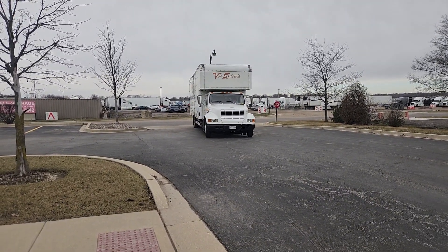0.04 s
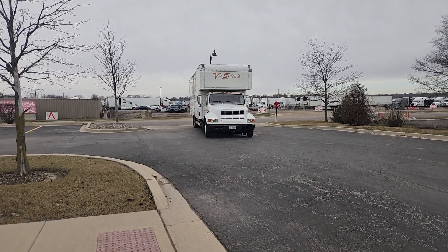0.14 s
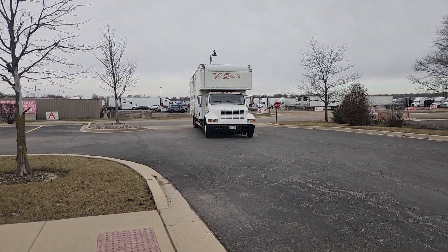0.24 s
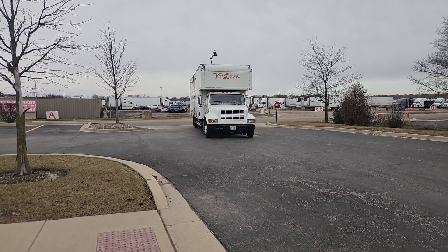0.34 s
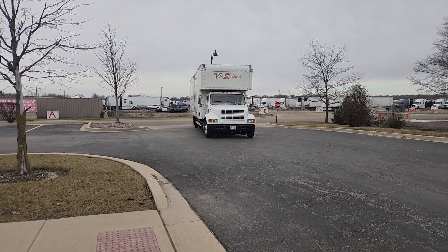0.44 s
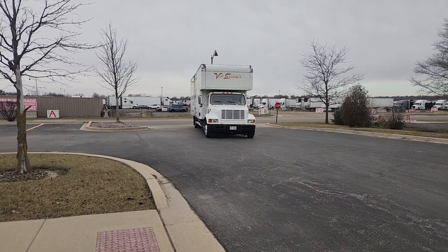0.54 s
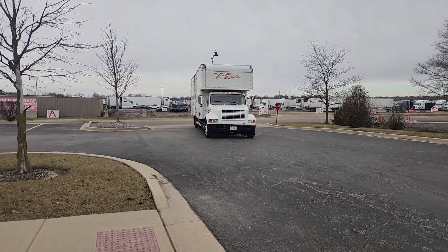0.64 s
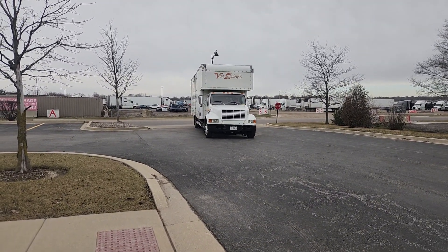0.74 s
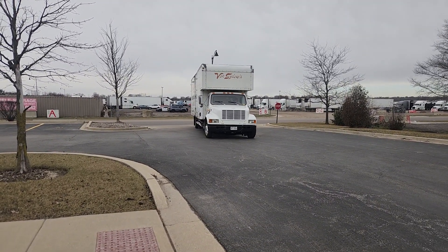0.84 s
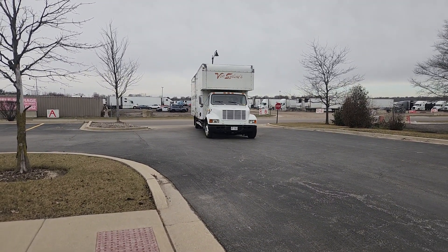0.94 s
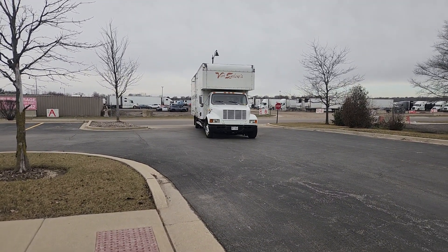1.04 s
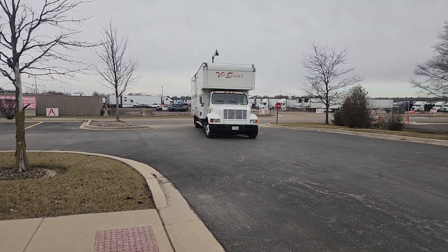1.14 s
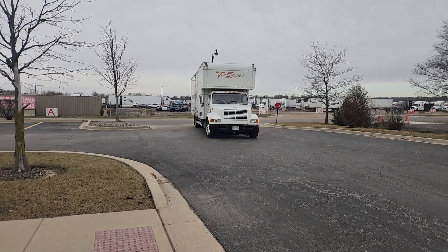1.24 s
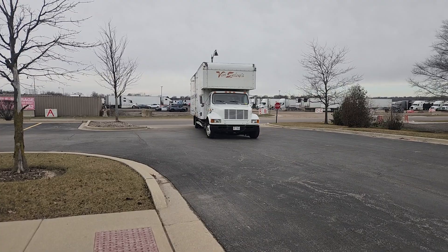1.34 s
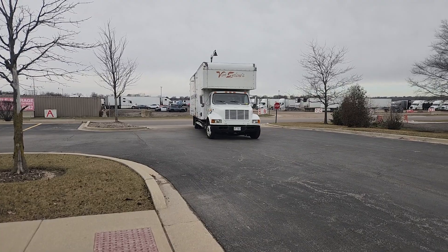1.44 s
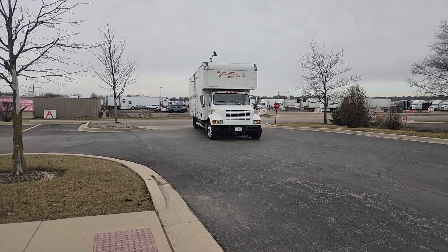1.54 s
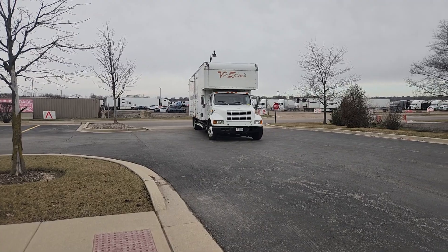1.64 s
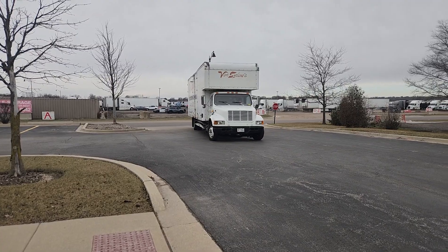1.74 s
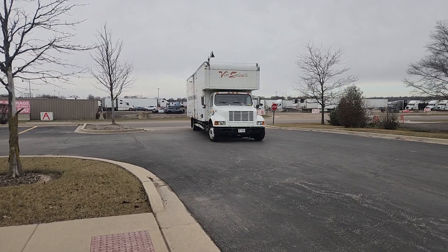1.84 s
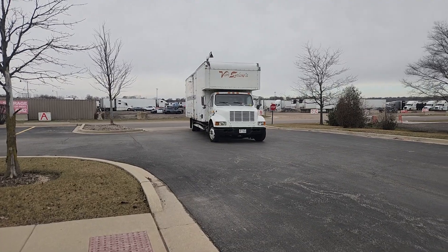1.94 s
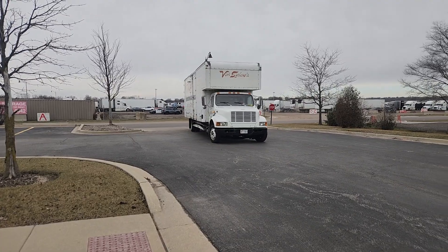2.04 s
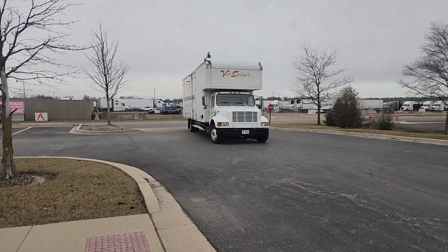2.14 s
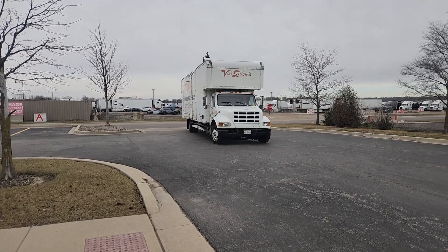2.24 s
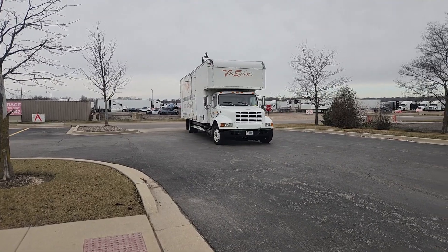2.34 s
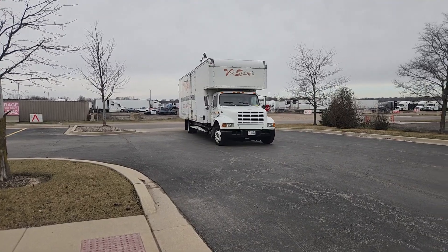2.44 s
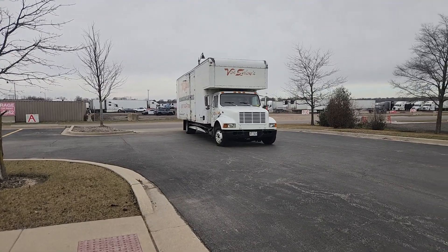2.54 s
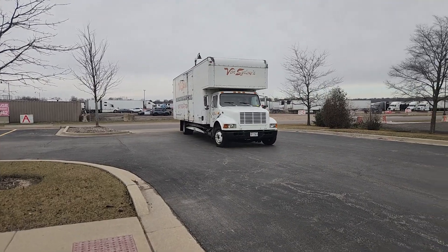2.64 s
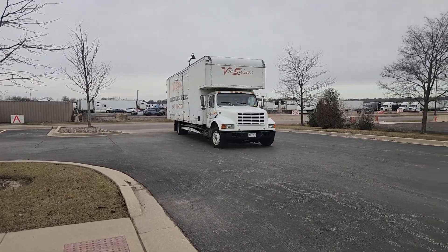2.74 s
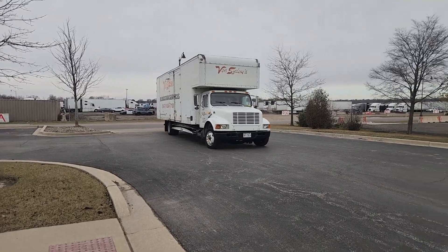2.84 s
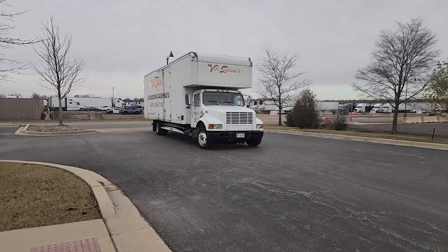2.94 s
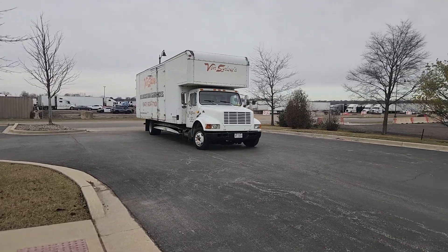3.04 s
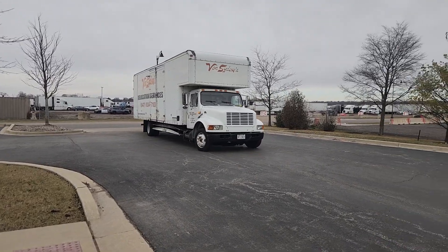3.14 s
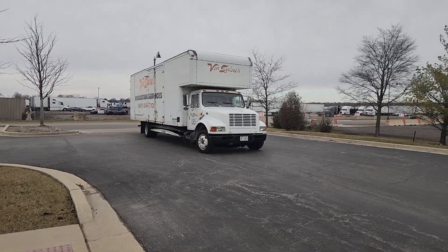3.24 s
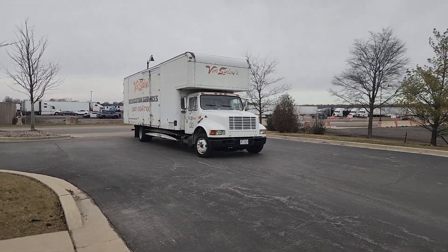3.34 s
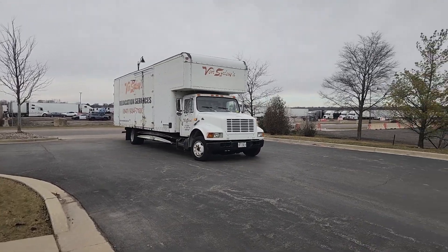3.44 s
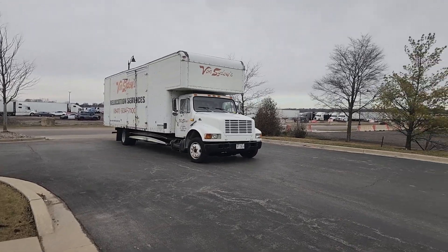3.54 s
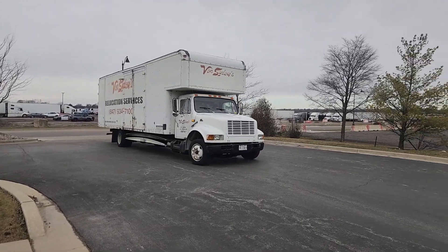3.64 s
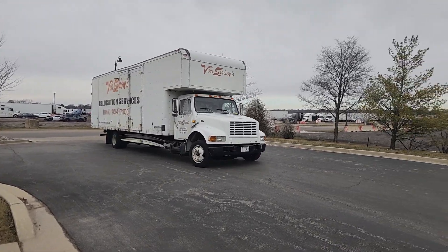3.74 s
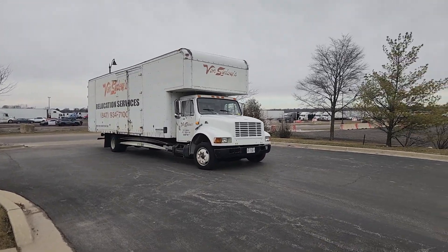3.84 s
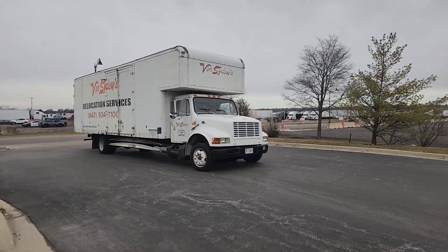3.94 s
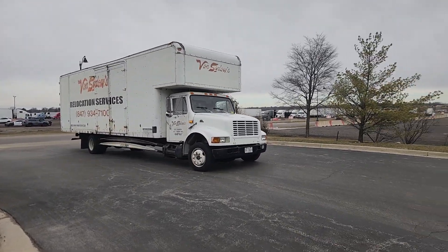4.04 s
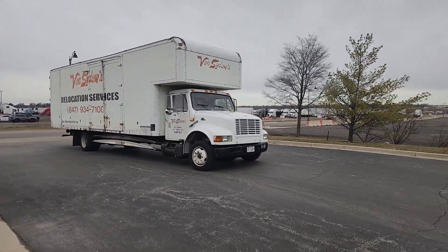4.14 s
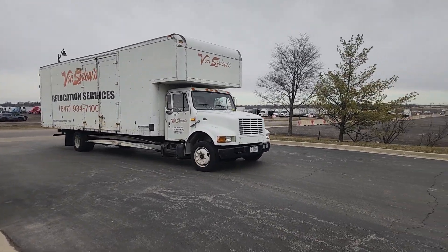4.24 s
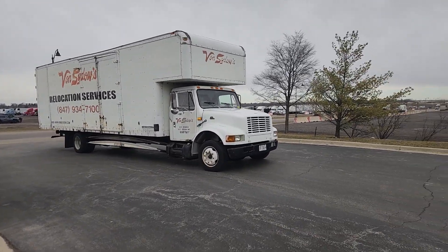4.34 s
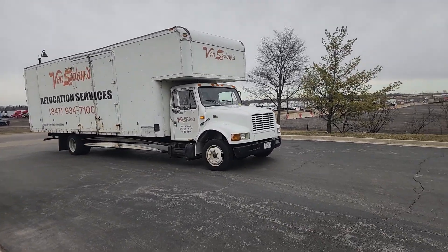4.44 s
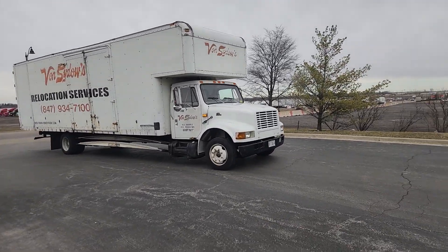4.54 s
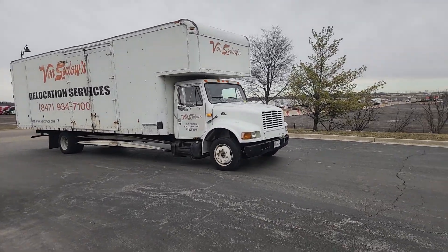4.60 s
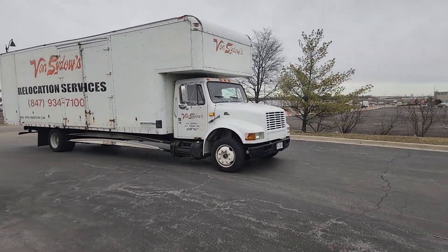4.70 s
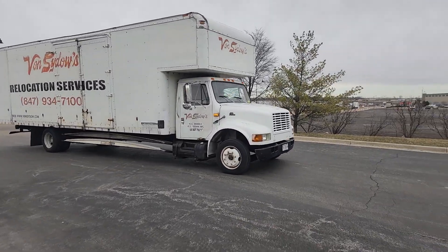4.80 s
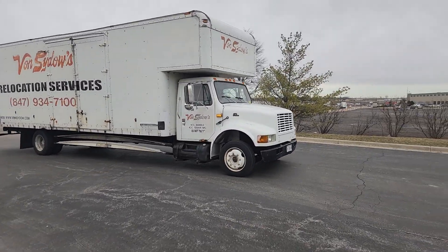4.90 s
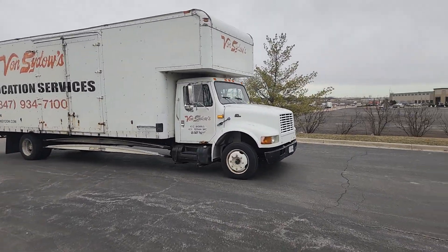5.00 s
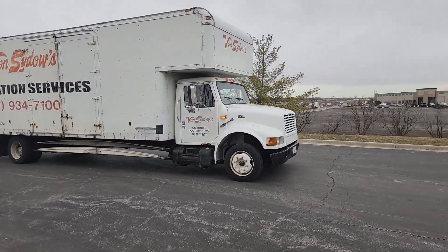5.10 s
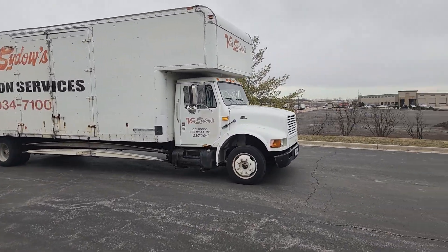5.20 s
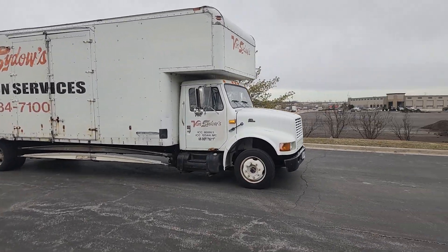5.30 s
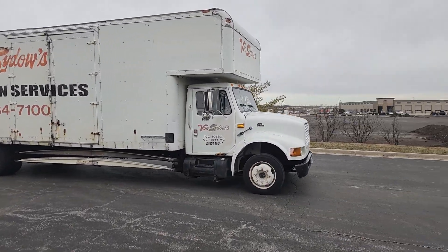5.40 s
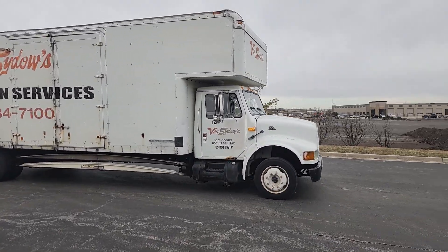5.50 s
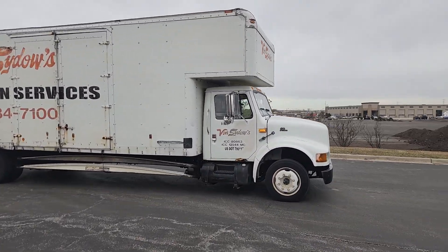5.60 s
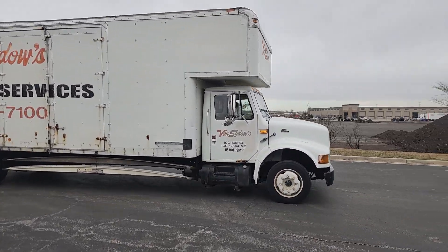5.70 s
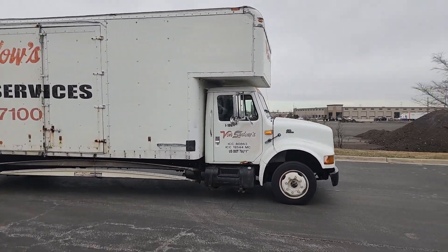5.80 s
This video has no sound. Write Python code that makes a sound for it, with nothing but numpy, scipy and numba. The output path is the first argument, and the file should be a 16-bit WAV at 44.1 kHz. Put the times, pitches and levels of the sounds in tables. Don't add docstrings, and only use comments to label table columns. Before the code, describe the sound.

Outdoors in an open lot, a diesel box truck starts nose-on with a quiet, low, uneven idle throb and a tiny puff of breeze. From about 0.4 s the engine picks up; clatter and valve ticks jump forward near 0.6 s, and pitch climbs steadily to nearly double by 1.4 s, with a brighter, harder edge around 1.2 s. From 1.5 to 3 s it holds a steady, rough drone whose boom fades and swells. As the truck swings side-on from 3 s, rumble, fan hiss and fine ticking grow fuller, their tone sliding, with a dip in the roar near 4 s and a soft wind puff at 4.6 s. By 5 to 5.9 s it is close and heavy, pitch sagging slightly, with a last low wind puff as it cuts off still running. Nearly everything is in the right channel; the left holds a faint, muffled boom.

```python
import sys
import numpy as np
from scipy import signal
from scipy.fft import rfft, irfft, next_fast_len
from scipy.io import wavfile
from numba import njit

SR = 44100
rng = np.random.default_rng(int(sys.argv[2]) if len(sys.argv) > 2 else 0)


def attenuation_scalar(level_db):
    decades = np.asarray(level_db, float) / 20
    return 10 ** decades


def file_out(sig):
    cols = np.atleast_2d(sig).T
    lim = np.clip(cols, -1, 1)
    pcm = np.round(lim * 32767).astype(np.int16)
    wavfile.write(sys.argv[1], SR, pcm)


N = 258426
BLOCK = 64

# start_s, firing_hz, boom_db
ENGINE_RUN = [(0, 36.59, -38), (.42, 40.18, -35.5), (.49, 41.28, -24), (.72, 49.62, -19.5),
              (.93, 54.85, -20.1), (1.06, 61.49, -17), (1.21, 69.72, -18.5), (1.42, 72.5, -20),
              (1.55, 70.58, -21.5), (2.17, 70.96, -20), (2.32, 73.09, -15.5), (2.8, 69.35, -22),
              (3.38, 69.65, -20), (3.75, 68.69, -15.5), (3.87, 69.71, -24), (4.6, 70.1, -16),
              (5.55, 66.43, -13), (5.86, 64.78, -9)]


def engine_run():
    return in_time(ENGINE_RUN)


# start_s, clatter_db
ENGINE_EFFORT = [(0, -40.5), (.35, -39), (.55, -38.5), (.59, -34), (.7, -32), (.9, -33), (.94, -32),
                 (1.12, -29), (1.47, -26.5), (1.56, -29.5), (2.25, -28), (2.5, -27), (2.72, -28),
                 (3.3, -28), (4.3, -26.5), (4.82, -26), (5.5, -27.5), (5.86, -28)]


def effort_db():
    return in_time(ENGINE_EFFORT)[0]


# start_s, share (0-1)
TRUCK_TURN = [(0, 0.01), (2.7, 0), (3.3, 0.36), (4.1, 0.59), (4.9, 0.74), (5.5, 0.96), (5.86, 0.97)]


def side_share():
    return in_time(TRUCK_TURN)[0]


# start_s, half_length_s, change_db
FIRST_FADES = [(0, 0.02, -4), (.05, .02, 7), (.11, 0.038, -8), (.67, .025, -4), (.93, .04, -3),
               (1.23, 0.05, -4.5), (1.42, .04, -3), (1.6, .03, -6), (2.79, .03, -1), (2.97, .1, -0.5),
               (4.91, 0.13, -3), (5.77, 0.078, -10)]
OVERTONE_2_FADES = [(.7, 0.28, 7.5), (1.6, .2, -18), (2.5, .7, -4.5), (3.8, 0.37, -14), (5.0, 0.34, 0),
                    (5.8, 0.18, -4)]
OVERTONE_3_FADES = [(.7, 0.22, -24), (1.2, 0.15, -4), (3.9, 0.76, -13.5), (5.05, 0.41, -21),
                    (5.7, 0.12, -3), (5.86, .08, 5)]


def boom_levels(boom_db):
    second_db = layer_db(cruise_db=-34, share=1.48, side_db=3.9)
    third_db = layer_db(cruise_db=-35, share=0.92, side_db=2.8)
    return [boom_db + bumps(FIRST_FADES), second_db + bumps(OVERTONE_2_FADES),
            third_db + bumps(OVERTONE_3_FADES)]


# times_firing_rate, level_db (against the rumble)
UNEVEN_TONES = [(0.83, -6), (1.5, -1.2), (11 / 6, -21), (13 / 6, -8), (2.3, -6), (2.8, -11),
                (17 / 6, -13.5)]


def exhaust(firings, orders_db, rumble_db):
    phase = 2 * np.pi * firings + 1.4
    out = np.zeros(N)
    for k, level_db in enumerate(orders_db):
        wander = .04 * drift(7) + .35 * k * drift(6) + .5 * k * drift(.4)
        level = np.sqrt(2) * attenuation_scalar(level_db + .7 * k * drift(5))
        out += level * np.cos((k + 1) * phase + wander)
    for multiple, level_db in UNEVEN_TONES:
        level = attenuation_scalar(rumble_db + level_db + 1.9 * drift(3.2))
        out += level * np.cos(multiple * phase + 0.92 * drift(3.2))
    return out


# start_s, half_length_s, change_db
RUMBLE_FADES = [
    (.29, 0.15, -6),
    (3.95, 0.19, -6.5),
    (4.9, 0.12, -4),
    (5.86, 0.19, -8),
]


def rumble_level():
    return layer_db(cruise_db=-28, share=0.95, side_db=3.5) + bumps(RUMBLE_FADES)


# pitch_hz, level_db (per Hz)
RUMBLE_TONE = [(8.8, -46), (15, -19), (39, -6.5), (70, -2), (92, -2.5), (117, -2), (150, -1.5), (197, -4),
               (279, -15.5), (330, -19), (430, -37), (730, -120)]


def rumble(repeat, rumble_db):
    roar = coloured(rng.standard_normal(N) + 0.2 * repeat, RUMBLE_TONE)
    return attenuation_scalar(rumble_db - 1.5 + 0.7 * drift(8.3)) * roar


# pitch_hz, level_db (per Hz)
CLATTER_TONE = [(180, -4), (260, -4), (400, 0), (700, 0), (1200, -1.5), (1600, -6.5), (1900, -21.5),
                (2600, -38)]


def clatter(firings, repeat):
    block = rng.standard_normal(N) + .7 * repeat
    block = block * knock(firings, depth=.09, sharp=2.5, lag=.45)
    return attenuation_scalar(effort_db() + 0.13 * drift(27)) * coloured(block, CLATTER_TONE)


# pitch_hz, level_db (per Hz)
FAN_TONE = [(1200, -24.5), (1700, 0), (2200, -1.5), (3000, -7.5), (3800, -10), (4700, -13), (5300, -22.5),
            (6000, -36)]


def fan_hiss(firings, repeat):
    air = rng.standard_normal(N) + .4 * repeat
    air = air * knock(firings, depth=.06, sharp=2.5, lag=.35)
    level_db = layer_db(cruise_db=-39.5, share=0.93, side_db=3.5)
    return attenuation_scalar(level_db + 0.36 * drift(17)) * coloured(air, FAN_TONE)


# start_s, half_length_s,
# change_db
VALVE_SWELLS = [(3.75, 0.27, 1.5), (4.5, 0.22, 1), (1.2, .2, 3), (1.2, .15, -1)]
# start_s, step_db
PEDAL_STEPS = [
    (.57, 5.5),
    (.92, 1.5),
]


def valve_level():
    level_db = layer_db(cruise_db=-62.5, share=0.75, side_db=6) + bumps(VALVE_SWELLS)
    for start_s, step_db in PEDAL_STEPS:
        level_db = level_db - step_db * (np.arange(N) < start_s * SR)
    return level_db


# pitch_hz, level_db (per Hz)
VALVE_TONE = [(4900, -15.5), (5400, -7), (6000, -4.5), (6700, -7), (7400, -1.5), (8000, -8.5), (8600, -15),
              (9600, -9.5), (10900, -8.5), (11900, -2), (12900, -3.5), (13800, -17), (15000, -21),
              (15800, -30)]


def valves(firings):
    taps = rng.standard_normal(N) * ticks(rate=33.0, spread_db=0.5)
    taps = taps * knock(firings, depth=.1, sharp=1.9, lag=0.2)
    sound = coloured(taps, VALVE_TONE)
    nose_on = 1 - side_share()[::BLOCK]
    # pitch_hz, width_hz, change_db when nose-on
    for hz, width_hz, level_db in [(6470, 1200, -2.5), (8500, 700, -3.5), (10600, 1500, -4), (14500, 2500, 5.0)]:
        sound = peak(sound, hz, width_hz, level_db * nose_on)
    return attenuation_scalar(valve_level() + .6 * drift(6.7)) * sound


def ticks(rate, spread_db):
    strength = attenuation_scalar(spread_db * np.minimum(rng.exponential(1, N), 4))
    hits = (rng.random(N) < rate / SR) * strength
    fade = np.exp(-1 / (0.0051 * SR))
    return rms_one(1 + 0.46 * signal.lfilter([1], [1, -fade], hits))


CYLINDER_STRENGTH = [-1.5, -5, 0.3, -1, -3.5, -4]


def knock(firings, depth, sharp, lag):
    since = firings - lag
    count = np.floor(since).astype(int)
    chance_db = 1.5 * rng.standard_normal(999)[count]
    strength = attenuation_scalar(np.array(CYLINDER_STRENGTH)[count % 6] + chance_db)
    burst = np.exp(-sharp * (since % 1))
    return rms_one(1 - depth + depth * strength * burst / burst.mean())


def contacts(firings, count, slop):
    angle, size = np.sort(rng.uniform(0, 6, count)), rng.standard_normal(count)
    turns = 6 * np.arange(firings[-1] // 6 + 1)
    at = (turns[:, None] + angle).ravel()
    at = np.interp(at, firings, np.arange(N))
    at = at + slop * SR * rng.standard_normal(len(at))
    out = np.zeros(N)
    np.add.at(out, np.clip(at, 0, N - 1).astype(int), np.resize(size, len(at)))
    return rms_one(out)


# nose_hz, half_turned_hz, side_hz, width_hz,
# nose_db, half_turned_db, side_db
BODY_REFLECTIONS = [(468, 617, 556, 240, 2.5, 4, 5.5), (721, 827, 980, 131, -7, -5, -4),
                    (1056, 1105, 1240, 325, 3.5, 3.5, 3.0), (1240, 1350, 1620, 66, -8.5, -2.5, -9),
                    (1497, 1560, 2000, 126, 8, 3, .3), (1665, 1900, 2430, 160, -6.5, -3.5, -9),
                    (2360, 2540, 2650, 200, 0, 3.5, -1.2), (2500, 2560, 2880, 110, -2.5, -7.5, -1),
                    (2640, 2990, 3150, 210, 3.5, 8, 6), (2900, 2960, 3030, 110, -5.5, -7.5, -10),
                    (3100, 3700, 3200, 200, 2, -0.7, 3), (3380, 3550, 3800, 150, -5, -2.5, 0),
                    (3720, 3850, 4000, 150, -5, -0.5, 3), (4430, 4440, 4300, 260, 1.5, 3.5, 4)]
# start_s, pitch_hz, change_db
PANEL_GLINTS = [(.3, 420, -2.5), (.75, 1000, 5), (1.8, 408, 5), (3.2, 386, 4), (4.0, 352, -2),
                (4.4, 570, 0.5), (3.7, 4800, 9), (3.7, 4240, 6), (4.85, 4794, 9.5), (5.0, 4220, 8),
                (5.05, 3130, 3.5), (5.75, 4800, 5)]
# start_s, half_length_s, pitch_hz, width_hz, change_db
BLOCK_SURGE = (1.21, 0.54, 2030, 1240, 5.4)


def reflections(x):
    turn = side_share()[::BLOCK]
    for row in BODY_REFLECTIONS:
        hz = np.interp(turn, [0, .5, 1], row[:3])
        level_db = np.interp(turn, [0, .5, 1], row[4:])
        shimmer_db = 0.51 * drift(2.2)[::BLOCK]
        x = peak(x, hz, row[3], level_db + shimmer_db)
    for at, hz, level_db in PANEL_GLINTS:
        x = peak(x, hz, 150, bumps([(at, 0.35, level_db)])[::BLOCK])
    at, half, hz, width_hz, level_db = BLOCK_SURGE
    return peak(x, hz, width_hz, bumps([(at, half, level_db)])[::BLOCK])


# start_s, half_length_s, level_db
BREEZE_PUFFS = [
    (0.018, 0.018, -28.5),
    (.1, .03, -36),
    (4.6, .06, -32),
    (5.86, .04, -25.5),
]


def breeze():
    band = signal.butter(2, [40, 110], "band", fs=SR, output="sos")
    low = rms_one(signal.sosfilt(band, rng.standard_normal(N)))
    return low * sum(attenuation_scalar(level_db) * bumps([(at, half, 1)]) for at, half, level_db in BREEZE_PUFFS)


def layer_db(cruise_db, share, side_db):
    return cruise_db + share * (effort_db() + 28.5) + side_db * side_share()


def in_time(rows):
    s, *columns = np.transpose(rows)
    return [np.interp(np.arange(N) / SR, s, c) for c in columns]


def bumps(rows):
    s = np.arange(N) / SR
    return sum(level_db * np.exp(-((s - at) / half) ** 2) for at, half, level_db in rows)


def rms_one(x):
    return x / np.sqrt(np.mean(x ** 2) + 1e-20)


def drift(rate):
    r = np.exp(-80 * np.pi * rate / SR)
    slow = signal.lfilter([1], [1, -2 * r, r * r], rng.standard_normal(N // 40 + 2002))
    slow = slow[2000:]
    return np.interp(np.arange(N) / 40, np.arange(len(slow)), rms_one(slow))


def coloured(x, spectrum):
    hz, level_db = np.transpose(spectrum)
    size = next_fast_len(N)
    grid = np.maximum(np.arange(size // 2 + 1) * SR / size, 1)
    gain = attenuation_scalar(np.interp(np.log(grid), np.log(hz), level_db, left=-90, right=-90))
    return rms_one(irfft(rfft(x, size) * gain, size)[:N])


def peak(x, hz, width_hz, level_db):
    w, lift, damp = 2 * np.pi * hz / SR, attenuation_scalar(level_db / 2), np.pi * width_hz / SR
    norm = 1 + damp / lift
    b0, b2 = (1 + damp * lift) / norm, (1 - damp * lift) / norm
    a1, a2 = -2 * np.cos(w) / norm, (1 - damp / lift) / norm
    return sliding_biquad(x, b0, a1, b2, a2, size=BLOCK)


@njit
def sliding_biquad(x, b0, a1, b2, a2, size):
    y, s1, s2 = np.empty_like(x), 0., 0.
    for i in range(len(x)):
        k = i // size
        y[i] = b0[k] * x[i] + s1
        s1 = a1[k] * (x[i] - y[i]) + s2
        s2 = b2[k] * x[i] - a2[k] * y[i]
    return y


def scene():
    firing_hz, boom_db = engine_run()
    firings = np.cumsum(firing_hz) / SR
    turn, rumble_db = side_share(), rumble_level()
    repeat = contacts(firings, count=400, slop=3e-5) * (1 - .5 * turn)
    uneven_db = rumble_db - 9.0 + 5.8 * turn
    truck = exhaust(firings - firings[-1], boom_levels(boom_db), uneven_db)
    truck = truck + rumble(repeat, rumble_db)
    truck = truck + reflections(clatter(firings, repeat) + fan_hiss(firings, repeat))
    truck = truck + valves(firings) + breeze()
    return np.array([truck, truck])


# pitch_hz, level_db (per Hz)
MICROPHONE_HISS = [(5000, -21), (8500, -27), (11000, -14), (13000, 1), (14500, -8), (16000, 1)]


def open_port(heard):
    heard = heard + attenuation_scalar(-71.5) * coloured(rng.standard_normal(N), MICROPHONE_HISS)
    return heard / (1 + np.abs(heard) ** 10) ** (1 / 10)


# start_s, half_length_s, change_db
COVER_SHIFTS = [
    (0, 0.045, -11),
    (.2, .27, 16),
    (1.7, .6, -2.1),
    (5.9, 0.33, 6),
]
# pitch_hz, width_hz, level_db
HOUSING_PATHS = [(580, 120, -72), (1050, 250, -80), (13700, 1700, -45)]


def blocked_port(direct, heard):
    dull = heard
    for order, cutoff_hz in [(1, 32.), (2, 165.)]:
        dull = signal.sosfilt(signal.butter(order, cutoff_hz, fs=SR, output="sos"), dull)
    left = attenuation_scalar(-40 + bumps(COVER_SHIFTS) + 6.5) * dull
    left = left + attenuation_scalar(-84) * direct + attenuation_scalar(-90) * rng.standard_normal(N)
    for hz, width_hz, level_db in HOUSING_PATHS:
        r = np.exp(-np.pi * width_hz / SR)
        ring = [1, -2 * r * np.cos(2 * np.pi * hz / SR), r * r]
        left = left + attenuation_scalar(level_db) * signal.lfilter([(1 - r * r) / 2, 0, (r * r - 1) / 2], ring, heard)
    return left


def top_cut(x):
    return signal.sosfilt(signal.butter(12, 15150, fs=SR, output="sos"), x)


def record(dry):
    heard = 2 * dry[1]
    mix = np.array([blocked_port(dry[0], heard), open_port(heard)])
    return top_cut(mix)


dry = scene()
out = record(dry)
file_out(out)
```